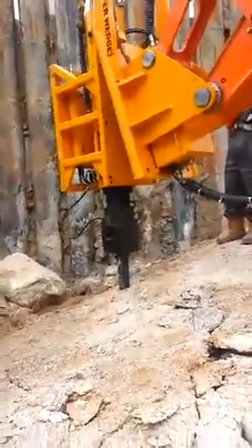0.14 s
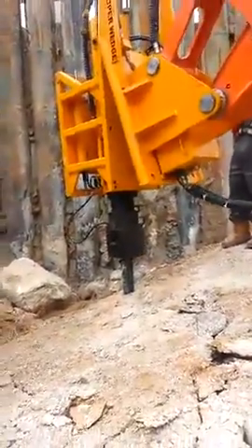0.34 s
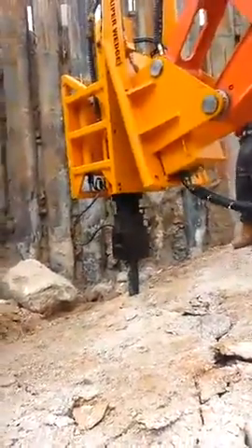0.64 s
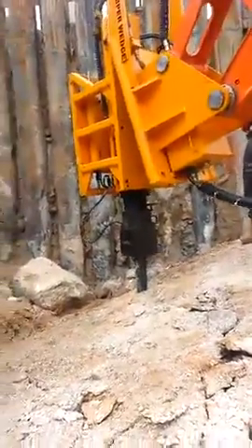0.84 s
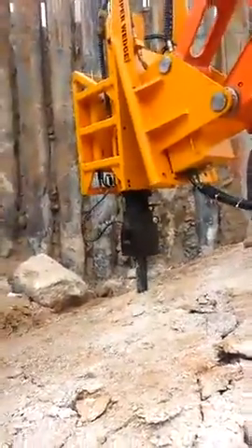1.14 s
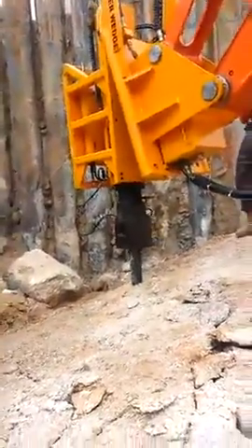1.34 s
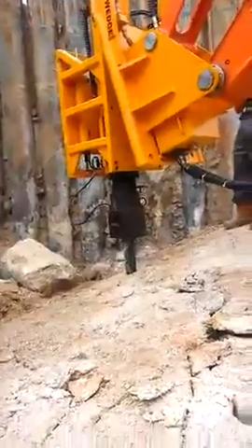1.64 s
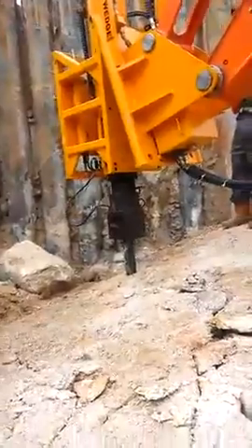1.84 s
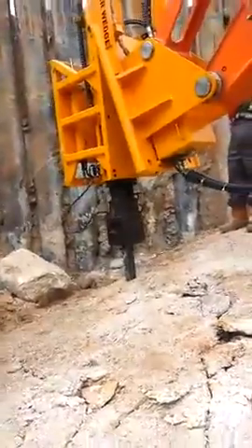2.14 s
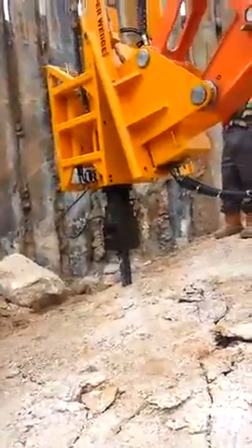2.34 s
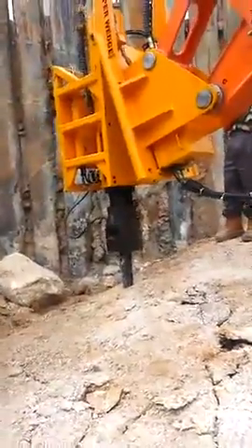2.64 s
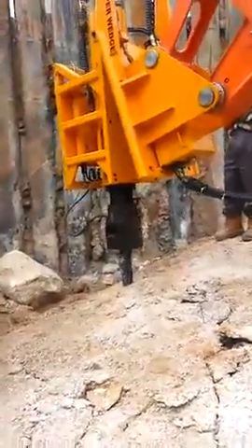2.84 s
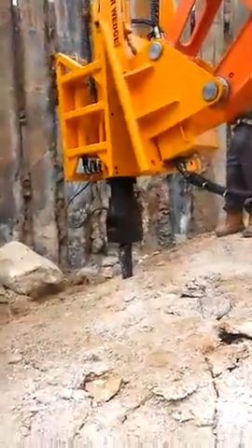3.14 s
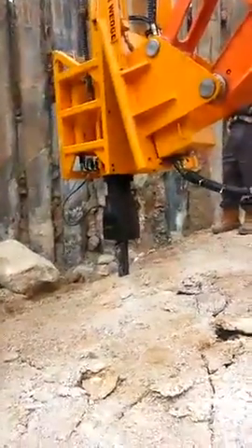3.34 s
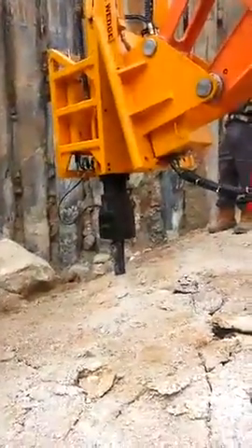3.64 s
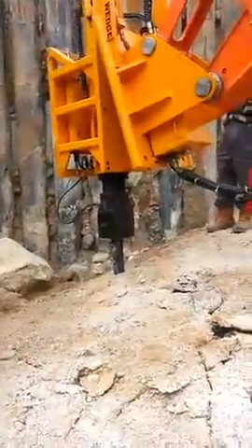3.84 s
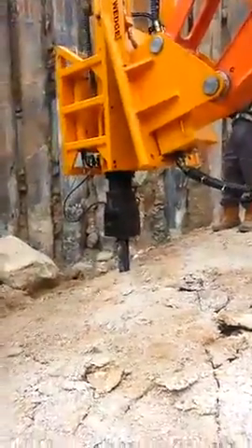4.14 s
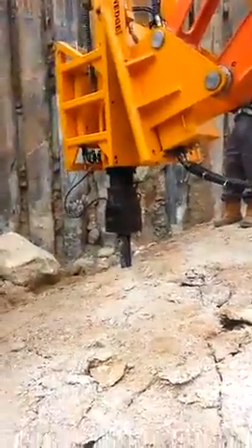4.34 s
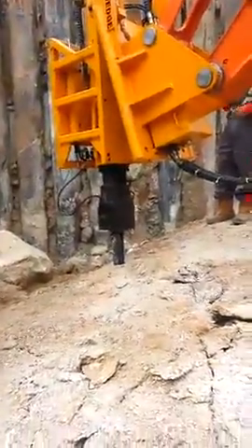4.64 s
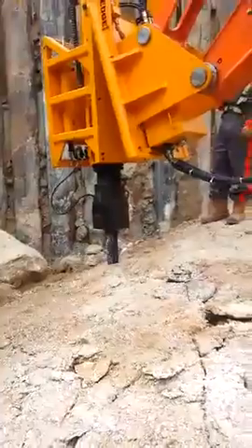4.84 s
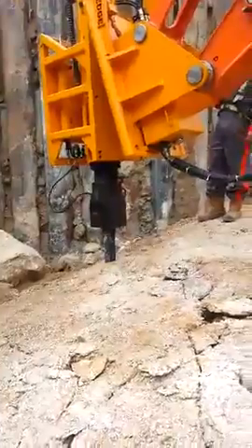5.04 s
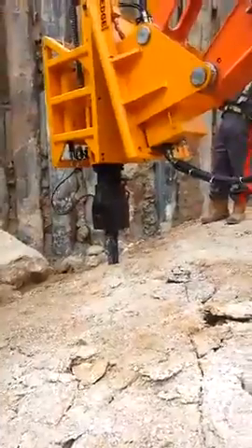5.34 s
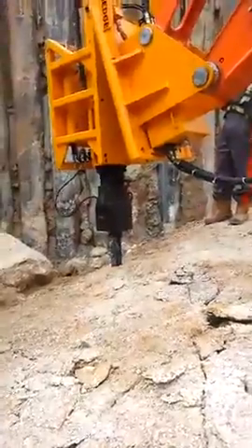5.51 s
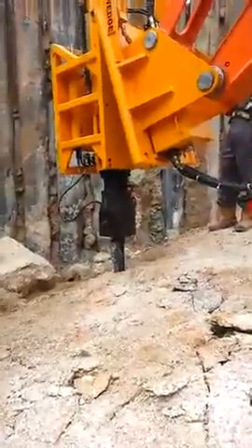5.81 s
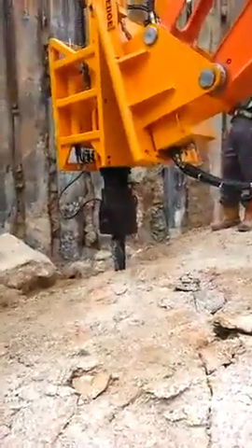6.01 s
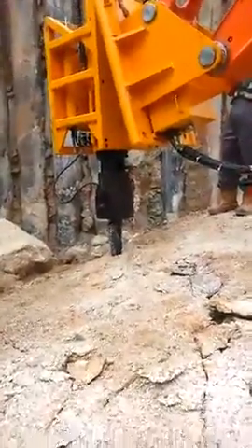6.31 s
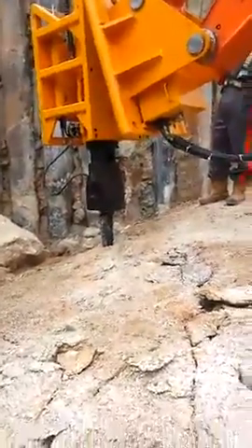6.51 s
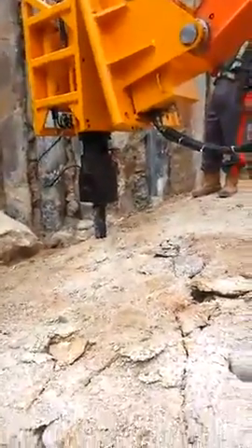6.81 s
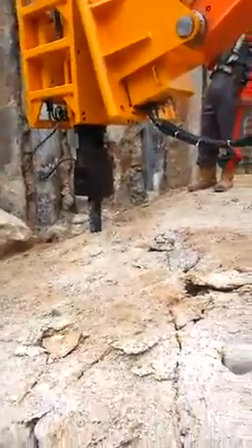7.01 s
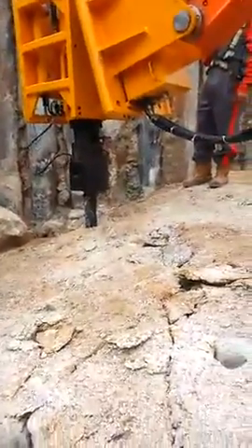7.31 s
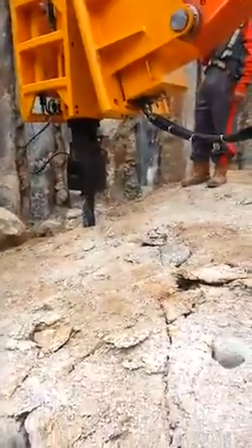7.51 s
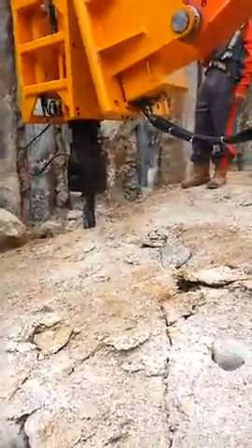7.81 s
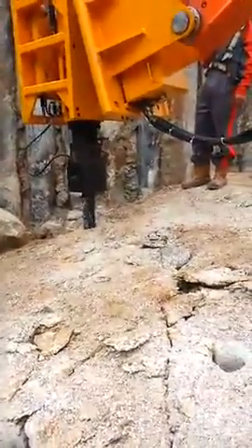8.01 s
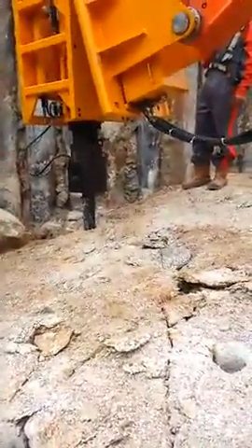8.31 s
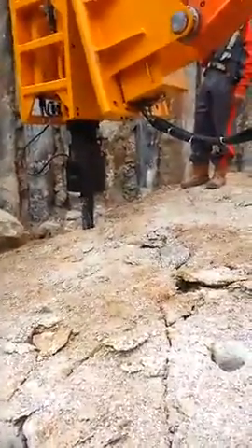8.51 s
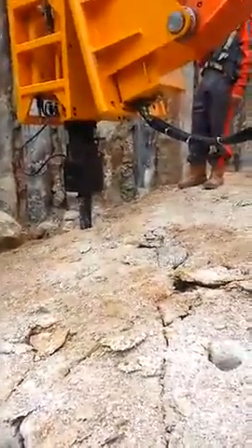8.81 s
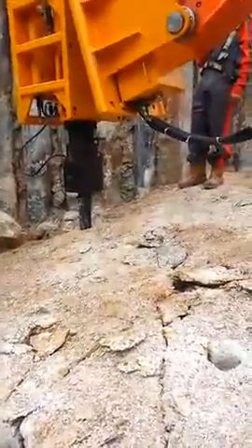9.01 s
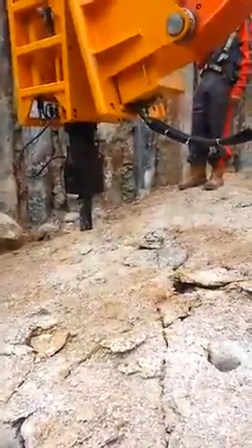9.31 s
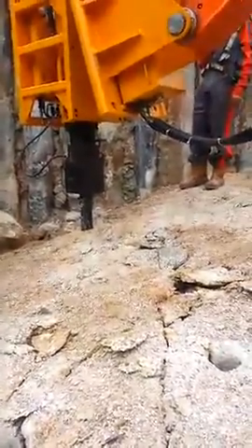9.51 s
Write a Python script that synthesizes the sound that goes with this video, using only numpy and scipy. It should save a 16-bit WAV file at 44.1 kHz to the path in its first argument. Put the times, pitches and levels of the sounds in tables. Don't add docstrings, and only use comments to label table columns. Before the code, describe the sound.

Steady hydraulic pump hum and rough engine roar at a rock-splitting site, with a squealing hiss, steel ticks and loud knocks against the microphone.

```python
import sys
import numpy as np
from scipy import signal
from scipy.fft import rfft, irfft, dct, next_fast_len
from scipy.io import wavfile
from scipy.ndimage import uniform_filter1d, map_coordinates

SR = 44100
rng = np.random.default_rng(int(sys.argv[2]) if len(sys.argv) > 2 else 0)


def transcribe(signal):
    frames = np.atleast_2d(signal).T
    limited = np.clip(frames, -1, 1)
    pcm = np.round(limited * 32767).astype(np.int16)
    wavfile.write(sys.argv[1], SR, pcm)


def magnitude_from_level(level_db):
    exponent = np.asarray(level_db, float) / 20
    return 10 ** exponent


N = 426006
T = np.arange(N) / SR
TOP_HZ = 8060
OPEN_S, CRACK_S, SWELL_S, SHUT_S, CLOSE_S = 1.05, .1, .4, 2.7, 0.2
DIP_S = 5.751

# start_s, peak_db, ring_hz, width_hz,
# t60_s
TICKS = [(1.026, -14, 3400, 2800, 0.07), (1.024, -12.5, 4600, 700, 0.1), (1.06, -26.5, 4800, 500, .04),
         (2.417, -14.5, 4920, 300, .05), (2.848, -15, 5860, 1180, .03), (2.877, -13.5, 3800, 1800, 0.054),
         (2.881, -14, 5600, 3500, 0.05), (4.15, -15, 2750, 503, 0.036), (4.498, -12, 4030, 7030, .016),
         (5.694, -7.5, 2260, 2000, 0.01), (6.2572, -1.5, 2230, 2530, 0.024), (8.079, -14, 5030, 3010, .04),
         (8.934, -23.5, 3460, 2500, 0.018), (9.346, -16.5, 4970, 3010, .008),
         (9.4165, -12.5, 6660, 1000, 0.008), (9.488, -14, 6600, 994, 0.009),
         (9.559, -12.5, 6360, 910, .016)]
# start_s, thud_db, thud_hz, crack_db, t60_s
KNOCKS = [(5.694, -2, 850, -4, .011), (5.7532, 8.5, 259.2, 7.5, .03), (5.759, 5.5, 799, 15, .042),
          (5.763, 3, 909, 8, .035), (5.767, 5, 430, 6, .035), (5.792, -7, 546, -6, .05),
          (5.803, -9.5, 850, -3.5, 0.043), (5.85, -6.5, 313, -11, .055), (6.2576, 7.5, 556, -4, 0.013),
          (6.258, 5.5, 825, -6.5, .014), (6.258, 4.5, 1142, -10.5, .014), (6.266, 1, 601, -13.5, 0.012),
          (6.288, -18, 498, -13, 0.02)]


def unit(x):
    return x / np.sqrt(np.mean(x ** 2) + 1e-20)


def along(points, hz):
    f, v = np.transpose(points)
    return np.interp(np.log(hz + 1), np.log(f + 1), v)


def curves(rows):
    s, *cols = np.transpose(rows)
    return [np.interp(T, s, c) for c in cols]


def wobble(rate_hz):
    coarse = T[::32]
    knots = rng.standard_normal(int(N * rate_hz / SR) + 4)
    return np.interp(T, coarse, map_coordinates(knots, [coarse * rate_hz]))


def filtered(x, response):
    m = next_fast_len(x.shape[-1] + 8192)
    return irfft(rfft(x, m) * response(np.fft.rfftfreq(m, 1 / SR)), m)[..., :x.shape[-1]]


def resonance(f, hz, width_hz):
    return 1j * f * width_hz / (hz * hz - f * f + 1j * f * width_hz)


def stereo(pair, colour):
    # freq_hz, likeness_0_1
    alike = [(60, .92), (300, .96), (470, .92), (940, .6), (1900, .5), (2700, .35), (3200, .1), (7500, .2)]
    # freq_hz, left_minus_right_db
    lean = [(60, 0.5), (100, 0.0), (180, -0.5), (300, -0.5), (510, 2.0), (870, 1.0), (1490, 4.0),
            (2550, 4.5), (4370, 0.5), (7460, 2.5)]
    # freq_hz, left_lead_rad
    port_lead = [(300, .1), (1400, -.4), (2700, -1.3), (4000, -6.5), (7700, -12)]

    def spread(f):
        turn = np.arccos(np.clip(along(alike, f), -1, 1)) / 2
        return colour(f) * [np.cos(turn), np.sin(turn)]

    def tilt(f):
        left = magnitude_from_level(along(lean, f) / 2) * np.exp(.5j * along(port_lead, f))
        return [left, 1 / left]

    mid, side = filtered(pair, spread)
    return unit(filtered(np.array([mid + side, mid - side]), tilt))


def tone(turns, db, pan_db=0, lead_rad=0, waver_db=0.5, drift=0.33):
    phase = 2 * np.pi * turns + drift * (wobble(12) + .2 * wobble(40))
    size = magnitude_from_level(db + waver_db * wobble(9)) * np.sqrt(2)
    own = .1 * abs(pan_db) * wobble(2)
    left = magnitude_from_level(pan_db / 2) * np.sin(phase + lead_rad / 2 + own)
    right = magnitude_from_level(-pan_db / 2) * np.sin(phase - lead_rad / 2 - own)
    return size * np.array([left, right])


def add(out, s, sound):
    spot = out[..., round(s * SR):round(s * SR) + sound.shape[-1]]
    spot += sound[..., :spot.shape[-1]]


def breeze():
    lumps = magnitude_from_level(3 * np.array([wobble(3), wobble(3)]) + 2.2 * wobble(1.2))
    air = rng.standard_normal((2, N)) + rng.standard_normal(N)
    return magnitude_from_level(-70.5) * unit(lumps * filtered(air, lambda f: resonance(f, 40, 45) ** 2))


def handling():
    # freq_hz, level_db_per_hz
    crack = [(300, -13.5), (1000, -3), (1800, -4), (2800, -0.5), (3700, -9.5), (5000, -1.5), (6300, -5),
             (8000, -16.5)]
    # time_s, buzz_db, buzz_hz, scrape_db
    rattle = [
        (5.768, -41.5, 400, -7),
        (5.785, -17, 403, -10),
        (5.795, -10.5, 394, -9),
        (5.812, -8.5, 408, -11.5),
        (5.824, -6.5, 415, -14),
        (5.832, -32.5, 423, -12),
        (5.86, -49, 418, -15.5),
        (5.93, -45, 423, -25.5),
    ]
    # start_s, peak_db, left_minus_right_db
    bumps = [(1.014, -51, 3.0), (2.386, -44, 1.0), (3.454, -55, 0.0), (5.214, -51, -2.5), (5.638, -47, 1),
             (5.787, -51, 2), (7.811, -56, 1), (8.248, -38, 2), (8.574, -40, -2), (8.881, -36, -1),
             (9.184, -54, -2), (9.507, -43, 6)]
    out, t = np.zeros((2, N)), T[:SR // 6]

    def gritty(n):
        noise = unit(filtered(rng.standard_normal((3, n)), lambda f: magnitude_from_level(along(crack, f))))
        return [[1, 0.16, 0], [1, 0, 0.6]] @ noise

    for s, thud_db, hz, crack_db, t60_s in KNOCKS:
        thud = -magnitude_from_level(thud_db - 60 * t / t60_s) * (1 - np.exp(-t / 0.00066)) * np.sin(2 * np.pi * hz * t)
        thud = thud - thud.sum() * np.exp(-t / .004) / (.004 * SR)
        snap = magnitude_from_level(crack_db - 9 - 60 * t / t60_s) * (1 - np.exp(-t / 0.0012)) * gritty(len(t))
        add(out, s, thud + snap)
    for s, db, pan_db in bumps:
        push = np.sin(2 * np.pi * 32 * t + rng.normal(0, .6, (2, 1)))
        push = push * magnitude_from_level(-60 * t / .15) * (1 - np.exp(-t / .015))
        add(out, s, magnitude_from_level(db + 5.5 + pan_db * np.array([[.5], [-.5]])) * push)
    buzz_db, buzz_hz, scrape_db = curves(rattle)
    live = (T > rattle[0][0]) & (T < rattle[-1][0])
    buzz = magnitude_from_level(buzz_db) * np.sin(2 * np.pi * np.cumsum(buzz_hz) / SR)
    return out + live * (buzz + magnitude_from_level(scrape_db - 8) * gritty(N))


def ticks():
    out, t = np.zeros((2, N)), T[:SR // 8]
    for s, db, hz, width_hz, t60_s in TICKS:
        near, left, right = rng.standard_normal((3, len(t)))
        envelope = magnitude_from_level(-60 * t / t60_s) * (1 - np.exp(-t * 22 / t60_s))
        burst = envelope * (near + 0.86 * np.array([left, right]))
        ring = filtered(burst, lambda f: resonance(f, hz, width_hz) ** 2)
        add(out, s, magnitude_from_level(db) * ring / abs(ring).max())
    return out


def surges():
    # start_s, length_s, level_db, first_hz, last_hz
    hose_surges = [
        (1.02, .08, -23, 804, 599),
        (2.65, .145, -16, 1300, 239.5),
        (2.7, .115, -14.5, 430, 200),
        (2.685, 0.061, -19, 700, 380),
    ]
    width_hz = 220
    out = np.zeros(N)
    for s, length_s, db, first_hz, last_hz in hose_surges:
        u = np.linspace(0, 1, round(length_s * SR))
        slide = 2 * np.pi * np.cumsum(first_hz * (last_hz / first_hz) ** u) / SR
        noise = rng.standard_normal((2, len(u)))
        rough = unit(filtered(noise, lambda f: 1 / (1 + (f / width_hz) ** 2)))
        whoop = rough[0] * np.cos(slide) + rough[1] * np.sin(slide)
        add(out, s, magnitude_from_level(db) * np.sin(np.pi * u ** 1.1) * whoop)
    return filtered(out, lambda f: 1 / (1 + (150 / (f + 1)) ** 6))


def valve():
    # mode_hz, width_hz, level_db
    squeal_modes = [(2110, 20, -7), (2190, 20, -5), (2272, 14, 0), (2335, 12, 0), (2462, 16, -1),
                    (2520, 25, -6), (2700, 30, -12), (4570, 60, -12), (5000, 120, -12)]
    # freq_hz, level_db_per_hz
    jet = [(1800, -30.5), (2400, -13), (3300, -17.5), (4900, 1), (6000, -0.5), (7200, -1.5), (8000, -10.5)]
    # start_s, length_s, pitch_hz
    flares = [(1.421, .12, 2240), (1.49, 0.14, 2455), (1.581, 0.15, 2266), (1.659, .27, 2460),
              (1.688, .19, 2340), (1.883, .21, 2280), (2.08, .12, 2466), (2.183, .2, 2310),
              (2.279, .27, 2295), (2.442, .15, 2328), (2.5, 0.13, 2505), (2.566, 0.16, 2270)]
    flare_db, scatter_db, glide_hz = -27, 2.5, 40
    shut_db = 39.5
    stages_s = [OPEN_S, OPEN_S + CRACK_S, OPEN_S + CRACK_S + SWELL_S, SHUT_S, SHUT_S + CLOSE_S]

    def flow(db, swell_db, creep_db):
        return magnitude_from_level(db + np.interp(T, stages_s, [-shut_db, -swell_db, 0, creep_db, -shut_db]))

    def modes(f):
        return sum((-1) ** k * magnitude_from_level(db) * resonance(f, hz, w) for k, (hz, w, db) in enumerate(squeal_modes))

    flutter = magnitude_from_level(1.7 * wobble(14))
    hiss = stereo(flutter * rng.standard_normal((2, N)), lambda f: magnitude_from_level(along(jet, f)) * (f > 1500))
    squeal = stereo(rng.standard_normal((2, N)), modes)
    out = flow(-27.5, 11.5, 1) * hiss + flow(-26.5, 24.5, 0) * squeal
    sizes_db = flare_db + scatter_db * rng.standard_normal(len(flares))
    for s, length_s, hz, db in np.column_stack([flares, sizes_db]):
        u = np.linspace(0, 1, round(length_s * SR))
        shiver = np.cumsum(rng.standard_normal(len(u))) * .04
        glide = glide_hz * rng.standard_normal() * (u ** 2 - u)
        phase = 2 * np.pi * length_s * (hz * u + glide) + shiver
        flare = magnitude_from_level([[2], [-2]]) * np.sin(phase + [[-.5], [.5]])
        add(out, s, magnitude_from_level(db) * np.sin(np.pi * u) ** 0.44 * flare)
    return out


def machine():
    # time_s, pulse_rate_hz, ripple_db
    shaft = [(0, 322.4, -27.5), (.4, 321.2, -22.5), (.78, 320.3, -30), (1.0, 319.3, -29.5),
             (1.15, 317.1, -21), (1.6, 315.3, -22.5), (2.0, 317.5, -23), (2.7, 317.3, -21.5),
             (2.9, 318.8, -36.5), (3.05, 321, -28), (3.4, 321.1, -20.5), (3.75, 321, -24), (4.1, 321, -21),
             (5.5, 320.8, -20.5), (6.1, 320.6, -25), (6.9, 320.1, -20), (8.4, 320.7, -21.5),
             (9.66, 320.7, -23)]
    # time_s, turn_share_0_1
    swing = [
        (0, 0.4),
        (.8, 0),
        (5.8, .05),
        (7.6, 1),
        (9.66, .9),
    ]
    # pump_multiple, level_db, db_per_ripple_db, load_gain_db, turn_gain_db
    pump_orders = [(2, -34, 0.54, -1.5, 3), (3, -36, -0.24, -1, 0), (4, -39, -0.5, 1.5, 0.5)]
    # firing_multiple, level_db, db_per_ripple_db, load_gain_db, turn_gain_db
    exhaust_orders = [(1, -36, .1, -2.5, 1.5), (2, -30, .8, 2.5, -5), (4, -38.5, 0.55, 5.5, 1.5),
                      (8, -50, 0.073, 1, 15.5), (6, -39, 0, 5, 1)]
    # centre_s, half_length_s, boost_db
    flutters = [(.14, 0.044, 5), (0.227, 0.037, 8), (0.323, .05, 7), (0.513, .025, 9), (0.562, 0.02, 11),
                (0.636, 0.041, 7.5), (.82, .12, 3)]
    # pump_multiple, level_db, left_minus_right_db, left_lead_rad
    whine_lines = [(.2895, -49, 0, 0), (1.158, -37, -.5, .2), (.773, -41, 0, 0), (1.545, -43, 0, 0),
                   (5, -47, 4, .3), (4.247, -43, 3, -1), (6.18, -46, 4, -.8)]
    # freq_hz, level_db_per_hz
    roar_colour = [(25, -39), (55, -29), (85, -16.5), (150, -5.5), (210, -6.5), (270, -2), (420, -2.5),
                   (750, -5), (1300, -3.5), (2600, -8), (3300, -14), (5000, -14.5), (6500, -16),
                   (7900, -28)]

    rate_hz, ripple_db = curves(shaft)
    facing, = curves(swing)
    opening = np.interp(T, OPEN_S + np.array([0, CRACK_S]), [0, 1])
    load = opening * np.interp(T, SHUT_S + np.array([0, CLOSE_S]), [1, 0])

    def level(db, follow, load_db, turn_db):
        usual_ripple_db = -21
        return db + follow * (ripple_db - usual_ripple_db) + load_db * load + turn_db * facing

    turns = np.cumsum(rate_hz) / SR
    firing = .4343 * turns

    second, third, last = (level(*row[1:]) for row in pump_orders)
    flutter_db = sum(db * np.clip(1 - ((T - s) / half_s) ** 2, 0, 1) for s, half_s, db in flutters)
    pump = tone(turns, ripple_db, -.5, .15, waver_db=1.0, drift=0.18)
    pump += tone(2 * turns, second, 5, 0.53, waver_db=2.1, drift=0.17)
    pump += tone(3 * turns, third + flutter_db, 1.1, 0.25, waver_db=1.4, drift=.5)
    pump += tone(4 * turns, last + .6 * flutter_db, 5, 0, waver_db=3, drift=0.65)

    note, twice, fourth, mesh, sixth = (level(*row[1:]) for row in exhaust_orders)
    exhaust = tone(firing, note, waver_db=3, drift=0.07)
    exhaust += tone(2 * firing, twice, waver_db=2.0, drift=0.2)
    exhaust += tone(4 * firing, fourth, waver_db=2.5)
    exhaust += tone(8 * firing, mesh, 5, .4)
    exhaust += tone(6 * firing, sixth, 5.5, -1.8, waver_db=2.0, drift=0.36)
    turbine = tone(8.495 * turns, -44 + 6.5 * facing, 7, -1.4, waver_db=2.2, drift=.6)

    whines = sum(tone(k * turns, db, pan_db, lead_rad, waver_db=3.5, drift=.75)
                 for k, db, pan_db, lead_rad in whine_lines)
    unsteady = .45 * wobble(35) + 0.55 * wobble(8) + .4 * wobble(1.5016)
    throb = magnitude_from_level(.45 * np.cos(2 * np.pi * firing) + unsteady)
    roar = stereo(throb * rng.standard_normal((2, N)), lambda f: magnitude_from_level(along(roar_colour, f)))
    return pump + exhaust + turbine + whines + magnitude_from_level(-19.5) * roar


def scene():
    return breeze() + handling() + ticks() + surges() + valve() + machine()


def gain_control():
    lead_s, blow_s, spring_s = .012, 0.0054, 0.058
    limiter_db = np.interp(T, DIP_S + np.array([-lead_s, 0, blow_s, blow_s + spring_s]), [0, -15, -12, 0])
    sink_s, sink_time_s, sink_db = 5.8, .075, -17
    climb_s, climb_db_per_s = 6.608, 21.5
    leveller_db = sink_db * (1 - np.exp(-np.clip(T - sink_s, 0, None) / sink_time_s))
    leveller_db = leveller_db + climb_db_per_s * np.clip(T - climb_s, 0, None)
    return .5 + limiter_db + np.minimum(0, leveller_db)


def starved(x, scatter_db):
    # freq_hz, step_db
    coarse_steps = [(40, -50), (120, -30), (300, -16), (2400, -6), (3100, 5.5), (5500, 6), (6800, 6.5),
                    (8000, 9)]
    hop, band = 2816, 8
    count = N // hop + 3
    window = np.sin(np.pi * (np.arange(2 * hop) + .5) / (2 * hop))
    pair = np.pad([x[0] + x[1], x[0] - x[1]], ((0, 0), (hop, count * hop - N)))
    blocks = pair[:, hop * np.arange(count)[:, None] + np.arange(2 * hop)] * window
    a, b, c, d = np.split(blocks, 4, axis=2)
    lines = dct(np.dstack([-c[..., ::-1] - d, a - b[..., ::-1]]), type=4, norm="ortho")

    power = uniform_filter1d(np.mean(lines ** 2, axis=0), size=10 * band)
    level = np.sqrt(abs(power)) + 1e-9
    scatter = rng.standard_normal((count, hop // band))
    scatter = np.repeat((scatter + np.roll(scatter, 1, axis=0)) / np.sqrt(2), band, axis=1)
    step = level * magnitude_from_level(along(coarse_steps, np.arange(hop) * SR / 2 / hop) + scatter_db * scatter)
    hits = np.array([row[0] for row in TICKS + KNOCKS]) * SR // hop
    step[np.isin(np.arange(count), np.append(hits, hits + 1))] *= .05
    rounded = np.sign(lines) * np.floor(abs(lines) / step + .42) * step

    u, v = np.split(dct(rounded, type=4, norm="ortho"), 2, axis=2)
    back = np.dstack([v, -v[..., ::-1], -u[..., ::-1], -u]) * window
    mid, side = (back[:, :-1, hop:] + back[:, 1:, :hop]).reshape(2, -1)[:, :N]
    return np.array([mid + side, mid - side]) / 2


def low_pass(x):
    return signal.sosfilt(signal.butter(12, 8060, fs=SR, output="sos"), x)


def record(dry):
    full = filtered(dry, lambda f: f < TOP_HZ)
    treble = filtered(dry, lambda f: (f < TOP_HZ) / (1 + (2200 / (f + 1)) ** 4))
    starve_db = np.interp(T, DIP_S + np.array([-.026, -.004, 0, .001]), [0, -22, -22, 0])
    ducked = magnitude_from_level(gain_control()) * (full + (magnitude_from_level(starve_db) - 1) * treble)
    x = starved(ducked, scatter_db=2.5)
    clipped = x / (1 + abs(x / 1.15) ** 8) ** (1 / 8)
    return low_pass(clipped)


dry = scene()
out = record(dry)
transcribe(out)
```